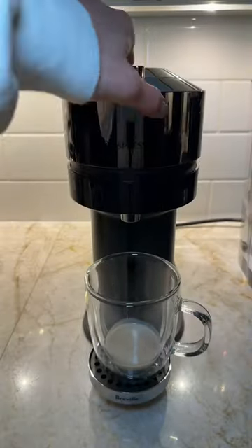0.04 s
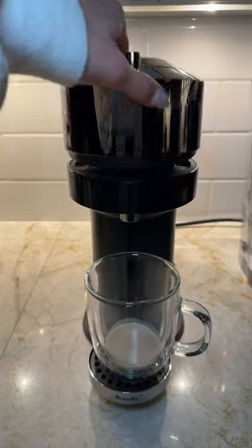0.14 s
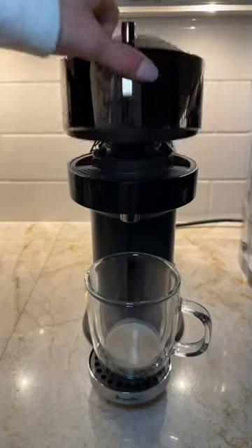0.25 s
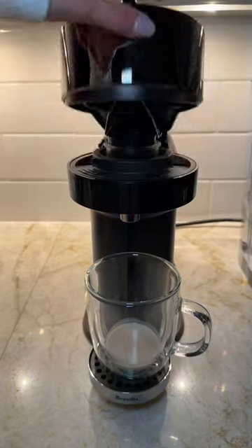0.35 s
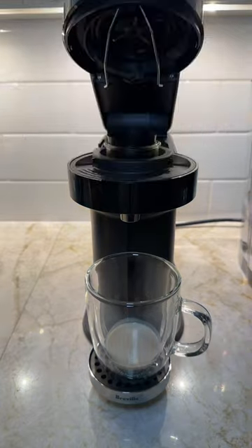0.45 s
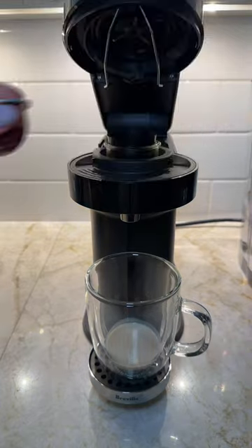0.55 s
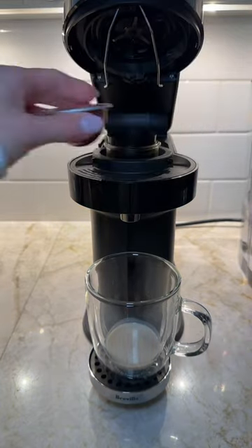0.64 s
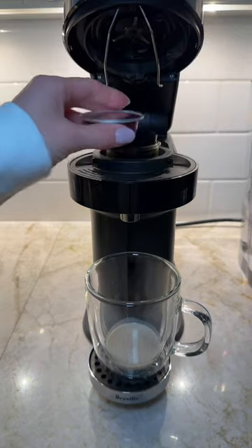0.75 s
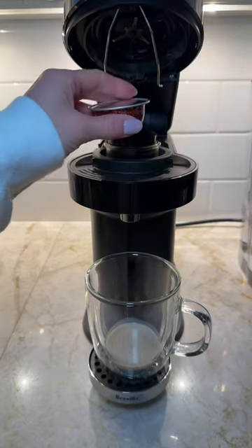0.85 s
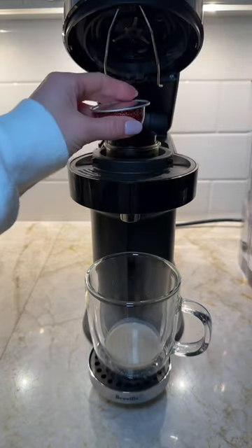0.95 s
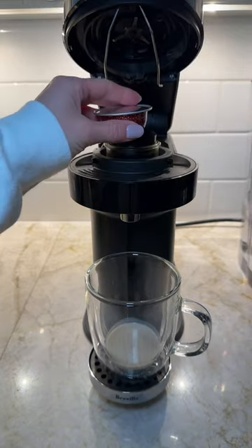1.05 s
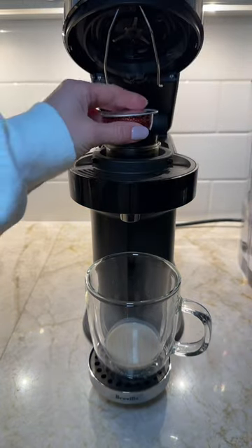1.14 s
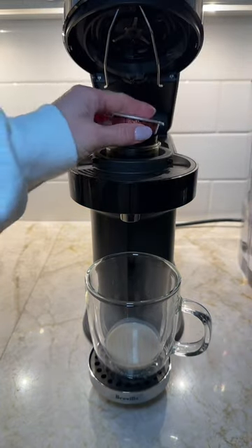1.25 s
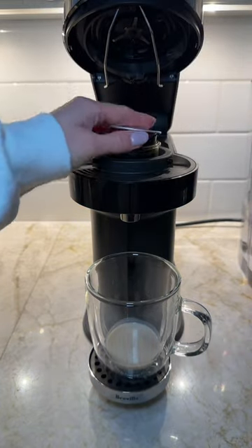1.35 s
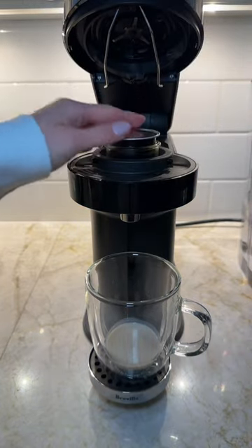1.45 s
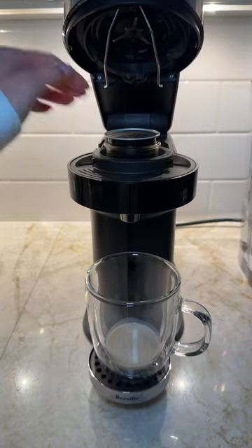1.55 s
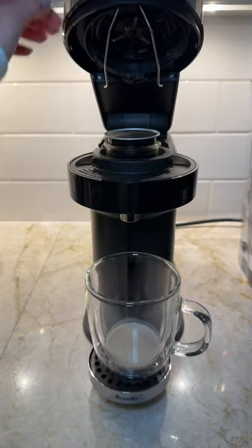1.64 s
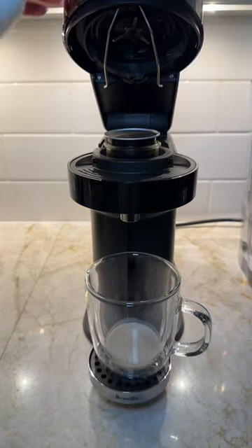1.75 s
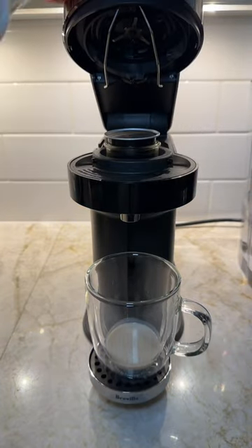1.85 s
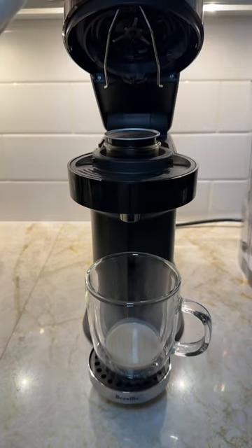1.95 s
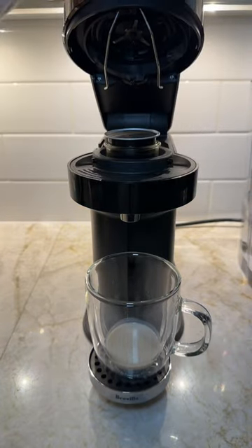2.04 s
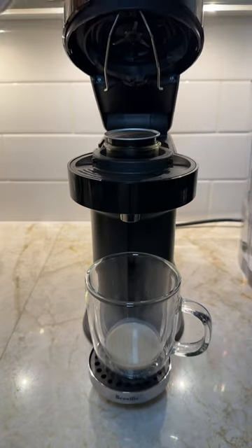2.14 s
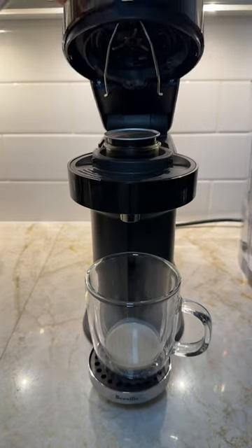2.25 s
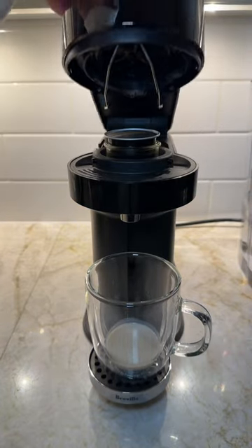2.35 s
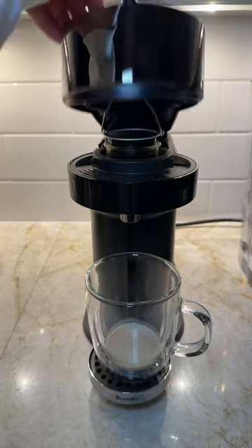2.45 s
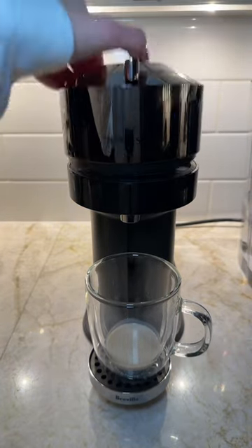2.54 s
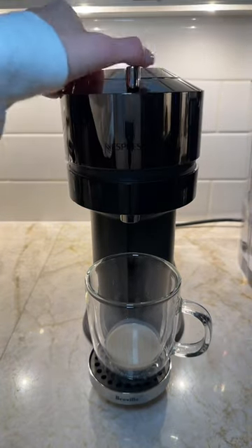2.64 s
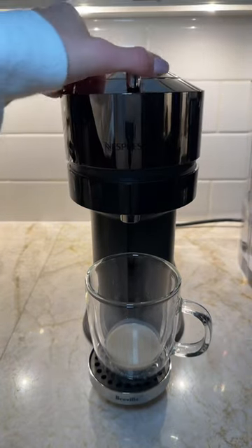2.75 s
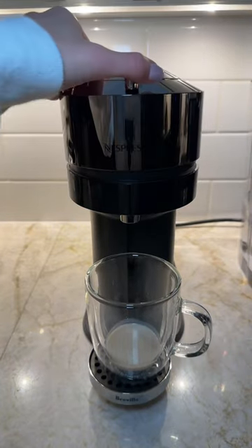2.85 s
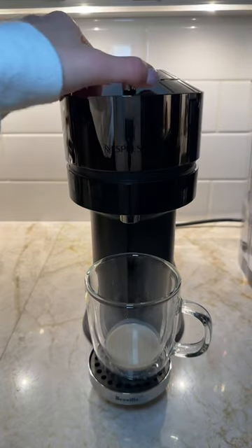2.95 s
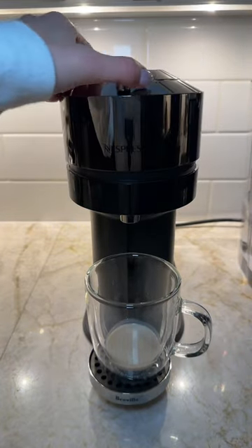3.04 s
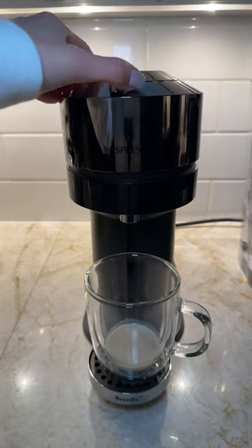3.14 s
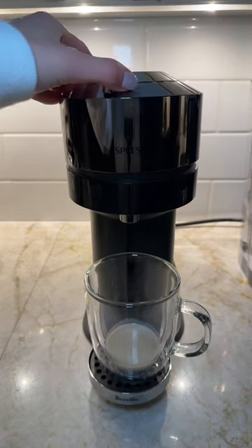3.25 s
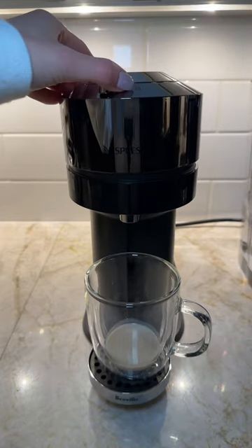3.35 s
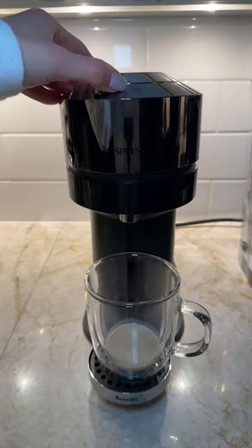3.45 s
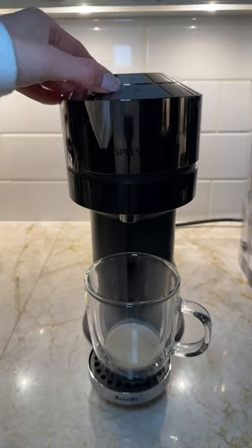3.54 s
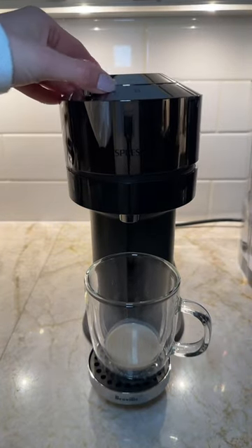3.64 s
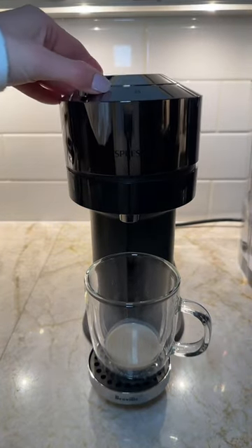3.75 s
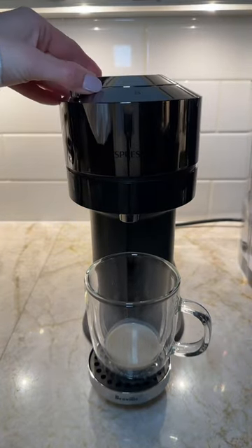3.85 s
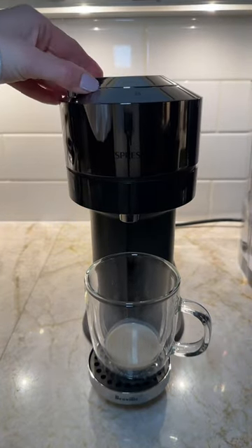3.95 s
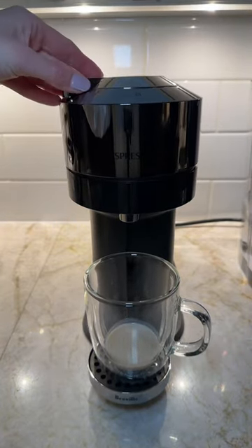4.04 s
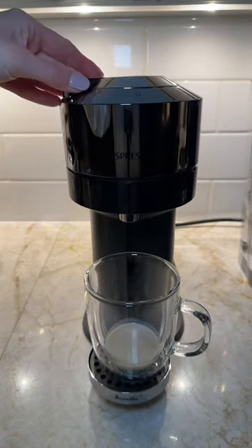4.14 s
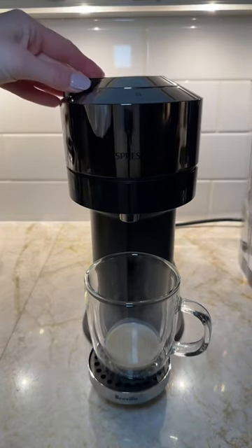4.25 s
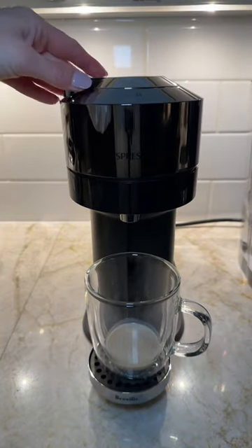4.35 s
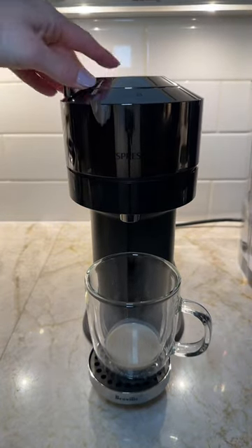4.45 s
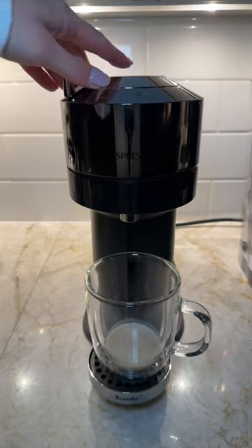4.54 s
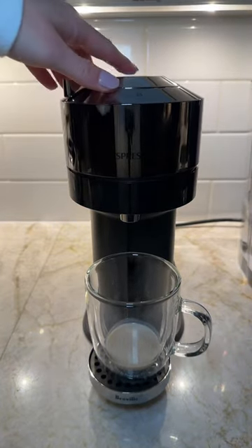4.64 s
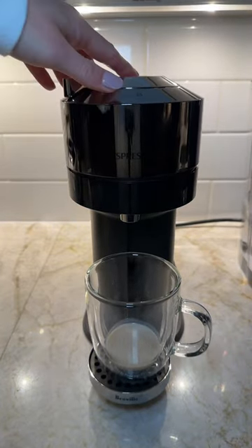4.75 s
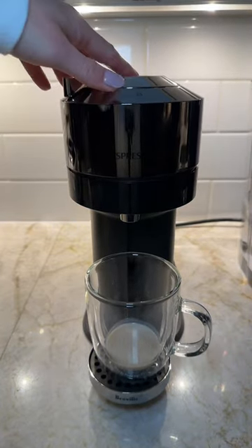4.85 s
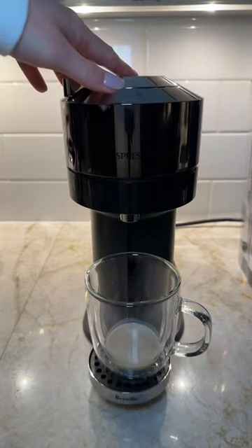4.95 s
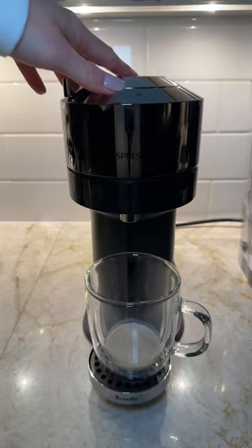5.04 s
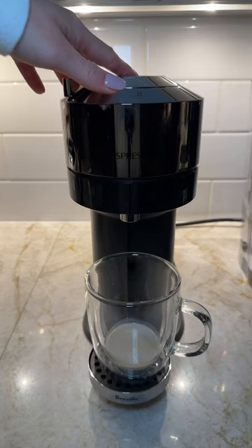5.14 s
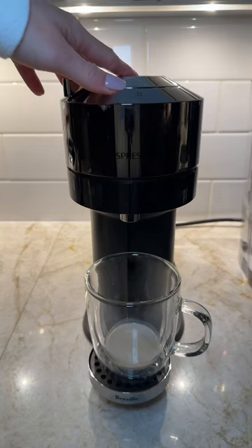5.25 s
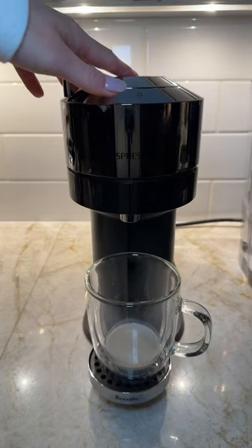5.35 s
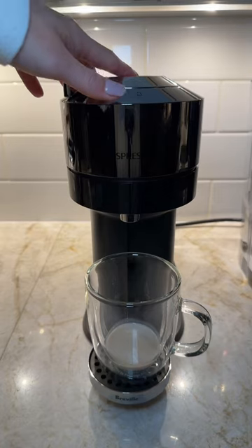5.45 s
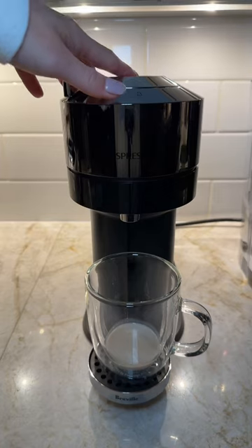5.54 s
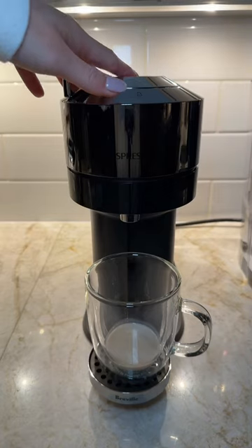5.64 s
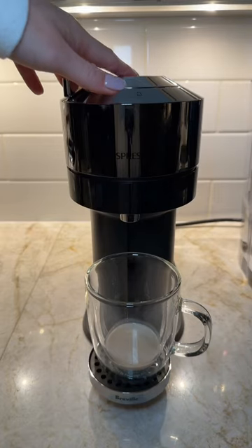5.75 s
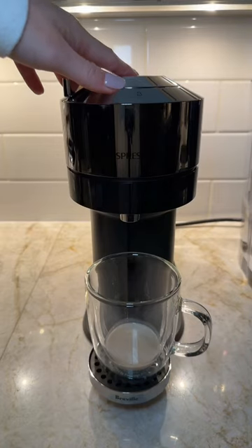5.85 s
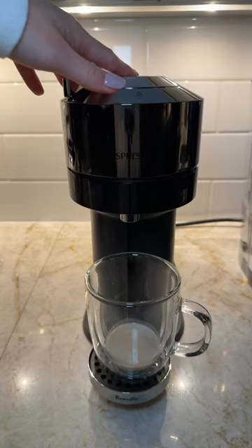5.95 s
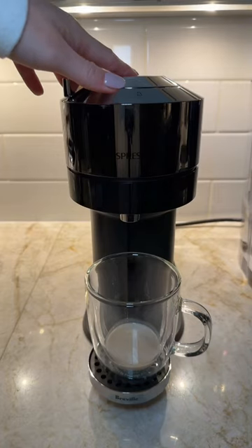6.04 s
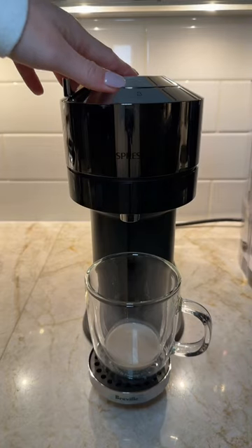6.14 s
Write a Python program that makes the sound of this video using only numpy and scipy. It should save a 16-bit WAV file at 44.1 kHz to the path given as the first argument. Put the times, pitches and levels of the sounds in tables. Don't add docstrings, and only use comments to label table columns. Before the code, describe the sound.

Close microphone in a hard, tiled kitchen with short bright reverberation and faint room air. From 0 s a plastic head unlatches with a dull knock, rattles and swings, striking its stop with a loud sharp clack at 0.43 s. Total silence from 0.55 to 0.74 s, then a low refrigerator hum near 115 Hz swells in and gradually settles. At 1.07 s a light capsule drops with a crisp ringing tick, bouncing at 1.13; soft rubbing and hollow clicks seat it at 1.5-1.75, small ticks and a low footstep thump around 2.1. At 2.76-2.86 the head slams in a dense, hard burst, its panels shivering away. Quiet lever scraping and knocks begin at 3.4, a bright click at 3.96, then a heavy clunk at 4.32. Mostly hum follows until faint button clicks at 5.67-5.84, when a grainy geared motor starts and quickly rises in loudness and pitch to the end.

```python
import sys
import numpy as np
from scipy import signal
from scipy.io import wavfile
from scipy.ndimage import uniform_filter1d

SR = 44100
rng = np.random.default_rng(int(sys.argv[2]) if len(sys.argv) > 2 else 0)


def elevation(decibels):
    levels = np.asarray(decibels, float)
    return 10 ** (levels / 20)


def dump(signal):
    limited = np.clip(np.atleast_2d(signal).T, -1, 1)
    pcm = np.round(limited * 32767).astype(np.int16)
    wavfile.write(sys.argv[1], SR, pcm)


N = 273420
TIME = np.arange(N) / SR

# (start [s], end [s])
GAP_S = (.551, 0.7395)


def rms_one(x):
    return x / np.sqrt(np.mean(x ** 2) + 1e-20)


def top_one(x):
    return x / np.sqrt(uniform_filter1d(x ** 2, size=88).max() + 1e-20)


def evened(x, size):
    return x / np.sqrt(uniform_filter1d(x ** 2, size=size) + 1e-12)


def at_hz(points, hz):
    points = np.array(points)
    return np.interp(np.log(hz), np.log(points[:, 0]), points[:, 1])


def band(x, low_hz, high_hz):
    sos = signal.butter(2, [low_hz, min(high_hz, 20000)], "band", fs=SR, output="sos")
    return signal.sosfilt(sos, x + 1e-18)


def resonance(x, hz, width_hz):
    r = np.exp(-np.pi * max(width_hz, 1) / SR)
    poles = [1, -2 * r * np.cos(2 * np.pi * hz / SR), r * r]
    return signal.lfilter(np.array([1, 0, -1]) * (1 - r * r) / 2, poles, x + 1e-18)


def body(x, peaks, widen):
    out = 0
    for k, (hz, width, db) in enumerate(peaks):
        out = out + (-1) ** k * elevation(db) * resonance(x, hz, min(widen * width, 700))
    return out


def drift(rate):
    r = np.exp(-80 * np.pi * rate / SR)
    slow = signal.lfilter([1], [1, -2 * r, r * r], rng.standard_normal(N // 40 + 2002))[2000:]
    return np.interp(np.arange(N) / 40, np.arange(len(slow)), rms_one(slow))


def grains(per_s, uneven_db):
    sizes = elevation(uneven_db * np.minimum(rng.exponential(1, N), 4)) * rng.choice([-1, 1], N)
    return sizes * (rng.random(N) < per_s / SR)


def swells(rows):
    out = np.zeros(N)
    for s, db, rise, fall in rows:
        last = min(s + 3 * fall, GAP_S[0] if s < GAP_S[0] else N / SR)
        at = np.arange(max(int((s - 3 * rise) * SR), 0), int(last * SR))
        t = at / SR - s
        out[at] += elevation(db - 20 * np.where(t < 0, -t / max(rise, .002), t / max(fall, .002)))
    return out


# (frequency [Hz], level [dB])
AIR_SPECTRUM = [(24, -39), (40, -17.5), (118, -2), (168, -12), (233, -6), (288, -10), (461, -13),
                (583, -23.5), (671, -18), (1460, -32), (1640, -30), (1800, -30.5), (8300, -37),
                (11000, -44.5), (14300, -77), (22000, -120)]
# (time [s], level [dB])
AIR_SWELL = [
    (0.75, 2),
    (6.2, -1.5),
]
AIR_DB, HISS_DB = -69, -90


def air():
    out, white = 0, rng.standard_normal((2, N))
    edges = 30 * 2 ** np.arange(0, 9.1, .5)
    for k, (low, high) in enumerate(zip(edges, edges[1:])):
        level_db = at_hz(AIR_SPECTRUM, np.sqrt(low * high)) + 0.5 * drift(9.2)
        out = out + elevation(level_db) * band(white[k % 2], low, high)
    hiss = elevation(HISS_DB) * rms_one(band(band(white[0], 12000, 14300), 11000, 14600))
    s, swell_db = np.transpose(AIR_SWELL)
    return out / np.std(band(out, 43, 11000)) * elevation(AIR_DB + np.interp(TIME, s, swell_db)) + hiss


# (multiple [1], level [dB])
OVERTONES = [(1, 0), (2, -11.5), (3, -24.5), (4, -22.5), (6, -26)]
# (frequency [Hz], width [Hz], level [dB])
UNSTEADY_TONES = [(1676, 33, -86.5), (234, 25, -70), (345, 16, -74.5)]
# (time of the top [s], level [dB], rise [s], fall [s])
RUMBLE = [
    (.05, -65.5, .5, 1.16),
    (.85, -68, 0.76, 0.34),
    (1.38, -67.5, 0.54, 0.26),
    (2.4, -68, 0.13, 0.57),
    (2.82, -56.5, 0.11, 0.17),
    (3.5, -63, 0.66, 2.),
    (4.36, -67.5, 0.36, 0.34),
    (4.65, -72, 0.17, 1.04),
]
RUMBLE_DB, RUMBLE_SAG_DB_PER_S = -74.5, 0.44
RUNNING_HZ, RUN_UP_HZ, RUN_UP_S = 114.5, 15, 0.5
HUM_DB, HUM_BEFORE_DB = -65, -80
STRAIN_DB, STRAIN_RISE_S, STRAIN_FALL_S = 11, 0.16, 1


def refrigerator():
    since = np.maximum(TIME - GAP_S[1], 0)
    hz = RUNNING_HZ - RUN_UP_HZ * np.exp(-since / RUN_UP_S) * (since > 0)
    strain_db = STRAIN_DB * (1 - np.exp(-since / STRAIN_RISE_S)) * np.exp(-since / STRAIN_FALL_S)
    level_db = np.where(since > 0, HUM_DB + strain_db, HUM_BEFORE_DB)
    phase = 2 * np.pi * np.cumsum(hz + 0.42 * drift(1.7)) / SR
    hum = sum(elevation(db + 1.5 * drift(25)) * np.sin(k * phase + k * k) for k, db in OVERTONES)
    hum = hum * np.sqrt(2) * elevation(level_db)
    rumble = evened(band(resonance(rng.standard_normal(N), 57, 3.5), 45, 77), size=9000)
    rumble = rumble * (swells(RUMBLE) + elevation(RUMBLE_DB - RUMBLE_SAG_DB_PER_S * TIME))
    tones = 0
    for f, width, db in UNSTEADY_TONES:
        tones = tones + elevation(db) * rms_one(resonance(rng.standard_normal(N), f, width))
    return hum + rumble + tones


# (frequency [Hz], t60 [s])
KITCHEN_T60 = [(150, 0.17), (700, 0.65), (2000, 0.58), (3500, 0.48), (5000, 0.42), (9000, 0.3),
               (15000, 0.08)]
SHIFTING = 2.5


def kitchen(x):
    t = np.arange(SR) / SR
    edges = 100 * 2 ** np.arange(0, 7.6, .5)
    white = rng.standard_normal((2, 2, SR))
    tails = 0
    for k, (low, high) in enumerate(zip(edges, edges[1:])):
        t60 = at_hz(KITCHEN_T60, np.sqrt(low * high))
        tails = tails + band(white[k % 2], low, high) * elevation(-60 * t / t60)
    tails = tails * np.minimum(t / 0.0064, 1)
    tails = tails / np.sqrt(np.sum(tails[0] ** 2))
    before = np.arange(N) < GAP_S[0] * SR
    wet = 0
    for part in (before, ~before):
        wet = wet + signal.fftconvolve((x * part)[None], tails, axes=1)[:, :N]
    turn = SHIFTING * drift(12)
    return np.cos(turn) * wet[0] + np.sin(turn) * wet[1]


# (time of the top [s], level [dB], rise [s], fall [s])
BUMPS = [
    (.048, -46.5, 0.061, 0.05),
    (.12, -53, 0.038, .08),
    (.172, -53, 0.044, 0.049),
    (.25, -53, 0.045, 0.098),
    (.446, -54.5, 0.023, .17),
    (2.83, -48.5, 0.049, 0.14),
    (3.398, -63, 0.039, 0.09),
    (3.468, -54.5, 0.034, 0.073),
    (4.128, -56.5, 0.098, 0.046),
    (4.325, -47.5, 0.027, 0.08),
]
# (time of the top [s], level [dB], rise [s], fall [s])
FOOTSTEP = [
    (2.11, -52.5, 0.03, 0.099),
    (2.17, -53, 0.13, 0.076),
]
# (frequency [Hz], width [Hz], level [dB])
COUNTER = [(91, 20, -1.5), (132, 80, -5.5), (161.6, 69, -4), (258.6, 7.6, -2.5)]


def bumps():
    knocks = band(body(grains(400, 0.37), COUNTER, widen=0.85), 61, 320)
    return swells(BUMPS + FOOTSTEP) * evened(knocks, size=1500)


# (time of the top [s], level [dB], rise [s], fall [s], dullness: low up, high down [dB])
SLIDING = [
    (0.0, -55, .1, 0.5, 3.5),
    (1.63, -64.5, 0.084, 0.12, 2.5),
    (2.15, -81.5, 0.34, 0.47, -5.5),
    (3.39, -70, 0.052, .06, 5),
    (3.47, -65, 0.04, 0.17, 5.5),
    (4.34, -63, .01, 0.21, 2),
    (3.828, -67.5, 0.3, 0.3, -0.5),
    (4.098, -63, 0.15, 0.15, 3),
    (4.312, -61, 0.079, 0.0032, -4.5),
    (4.334, -56.5, 0.011, 0.11, 8),
]
# (time of the top [s], level [dB], rise [s], fall [s])
RATTLE = [
    (2.762, -42, 0.003, 0.093),
    (2.788, -45.5, .003, 0.14),
    (2.81, -38.5, .015, 0.055),
    (2.848, -46, 0.03, 0.014),
]
# (time of the top [s], level [dB], rise [s], fall [s])
CLATTER = [
    (.142, -52, 0.047, 0.029),
    (.165, -52, 0.011, 0.044),
    (.278, -53, 0.01, 0.099),
    (0.439, -47, 0.027, 0.18),
]
# (frequency [Hz], width [Hz], level [dB])
THUD = [(196, 32, -1.5), (362, 79.6, 4), (497, 28, 7.5), (726, 24, -3.5), (1100, 7.7, -17),
        (1170, 79, -9.5)]
SLIDE_HIGH_DB = -16.5


def sliding():
    slips = grains(5000, 1.0) * elevation(1.5 * drift(31))
    low = rms_one(body(slips, THUD, widen=4.0))
    middle = rms_one(band(slips, 900, 3700))
    high = rms_one(band(slips, 8100, 20000))
    loose = rms_one(band(slips, 2900, 8800)) + elevation(-6.0) * low + elevation(-11.5) * middle + elevation(-14.0) * high
    out = swells(RATTLE + CLATTER) * loose
    for s, db, rise, fall, dull_db in SLIDING:
        stroke = middle + elevation(dull_db) * low + elevation(SLIDE_HIGH_DB - 1.8 * dull_db) * high
        out = out + swells([(s, db, rise, fall)]) * stroke
    return out


# (time of the top [s], level [dB], rise [s], fall [s])
FOIL = [
    (1.636, -59, 0.069, 0.079),
]
# (time of the top [s], level [dB], rise [s], fall [s])
PINCH = [
    (.82, -77.5, .2, .45),
]
# (frequency [Hz], width [Hz], level [dB])
HOLDER = [(1122, 200, -3.5), (1720, 110, 1.5), (1814, 73, -1.5), (2900, 300, -8), (3900, 420, -7.5),
          (4480, 200, -10), (5975, 95, -12), (6140, 120, -25), (7540, 90, -8), (8330, 530, -7),
          (10300, 71, -1.5), (11000, 93, -18)]


def foil():
    brush = grains(3100, 1.1)
    lid = [(hz, min(width, 150), 0) for hz, width, db in HOLDER[6:]]
    stroke = rms_one(rms_one(body(brush, lid, widen=1.2)) + .5 * rms_one(band(brush, 3360, 20000)))
    pinch = rms_one(rms_one(band(brush, 8100, 9700)) + rms_one(band(brush, 7000, 15000)))
    return swells(FOIL) * stroke + swells(PINCH) * pinch


# (time [s], level [dB], t60 [s], middle mode [Hz], mode spacing [Hz], blur [0-1])
HOLLOWS = [(0.26, -57, 0.36, 1300, 45, 0.45), (1.131, -53.5, 0.47, 1100, 110, 0.7),
           (1.518, -60, 0.13, 1550, 52, 0.4), (1.664, -52.5, 0.22, 960, 64, 1),
           (1.739, -52.5, 0.47, 1090, 60, 0.5), (3.97, -61, 0.37, 2000, 70, 0.9),
           (3.0, -57.5, 0.48, 520, 39, 0.95), (1.752, -58, 0.17, 350, 20, 0.2),
           (1.61, -64, .2, 4000, 45, .6), (0.18, -45.5, 0.065, 650, 92, 0.6),
           (0.36, -46, 0.088, 720, 40, 0.4), (5.965, -58, .4, 571, 15, .3),
           (6.135, -62.5, .5, 970, 13, 0.5), (2.808, -47.5, 0.33, 99, 5.8, 0.06),
           (2.853, -41, 0.74, 710, 22, 0.4), (2.856, -44, .45, 740, 62, .9), (2.87, -50, .2, 520, 48, .8),
           (1.068, -52.5, .3, 1150, 90, .9), (4.322, -44.5, .07, 410, 30, 0.2),
           (.44, -40.5, 0.13, 360, 32, .3), (.03, -46.5, 0.11, 200, 36, 0.7),
           (4.318, -52, 0.53, 960, 73, 0.62), (4.323, -39, 0.099, 210, 15, 0.17),
           (4.316, -47, 0.044, 767, 19, 0.5), (4.322, -48, 0.083, 520, 18, 0.2),
           (4.32, -40.5, 0.084, 440, 30, 0), (5.812, -51.5, 0.25, 410, 30.6, 0.13)]


def hollows():
    out, t = np.zeros(N + SR), np.arange(SR // 2) / SR
    for s, db, t60, hz, spacing, blur in HOLLOWS:
        modes = 0
        for k, share in ((-1, 1), (0, .8), (1.7, .5)):
            modes = modes + share * np.sin(2 * np.pi * (hz + k * spacing) * t)
        noise = band(rng.standard_normal(SR), hz - 1.5 * spacing, hz + 2 * spacing)
        loose = evened(noise, size=900)[SR // 2:]
        envelope = elevation(db - 60 * t / t60) * np.minimum(t / 0.00078, 1)
        at = round(s * SR)
        out[at:at + SR // 2] += envelope * ((1 - blur) * modes + blur * loose)
    return out[:N] * elevation(1.2 * drift(30) + 2.0 * drift(120))


# (time of the top [s], level [dB], rise [s], fall [s])
SHIVER = [
    (2.812, -53.5, 0.0054, 0.26),
    (2.858, -47, 0.005, 0.31),
    (3.07, -56.5, .2, 0.23),
]
# (time of the top [s], level [dB], rise [s], fall [s])
SIZZLE = [
    (2.86, -62.5, .01, .2),
    (3.02, -71, .15, 0.096),
]
# (frequency [Hz], width [Hz], level [dB])
HEAD = [(1630, 890, -1.5), (2258, 460, 5), (2650, 1400, 4), (3110, 780, 0), (4160, 500, -14)]


def shiver():
    knocks = grains(6000, 1.5) * elevation(2.0 * drift(90))
    buzz = band(band(knocks, 5000, 8000), 4000, 8500)
    small = rms_one(band(knocks, 3400, 6200)) + elevation(-5.5) * rms_one(buzz)
    return swells(SHIVER) * rms_one(body(knocks, HEAD, widen=1.1)) + swells(SIZZLE) * small


RATTLE_GROWS = 0.0027
RING_FED = 1.5


def contacts(rows, t60, thud_stretch, ring_db, crack, attack_s, tick_top_hz, sheen_db, wide, thud_hz):
    out, t = np.zeros((3, N + 7000)), np.arange(7000) / SR
    for s, db, hz, thud_db, tick_db in rows:
        dies = np.clip(t60 * (1.5 + RATTLE_GROWS * (db + 40.5)), .004, .12)
        rattle = rng.standard_normal((3, 7000)) * np.minimum(t / max(attack_s, 1e-4), 1)
        rattle[:, 8] += crack * np.array([4, 4, 1.5])
        blow = rattle[0] * elevation(-60 * t / dies)
        ring = blow * elevation(-60 * t / (RING_FED * dies))
        ring = resonance(resonance(ring, hz, wide * hz), hz, wide * hz)
        middle = band(band(blow, 1100, 3700), 800, 15000)
        thud = body(rattle[1] * elevation(-60 * t / (thud_stretch * dies)), THUD, widen=5.5)
        thud = band(thud, thud_hz / 2, thud_hz * 2)
        tick = rattle[2] * elevation(-60 * t / (0.26 * dies))
        tick = band(tick, 4500, tick_top_hz) + elevation(sheen_db) * band(tick, 12300, 15300)
        at = round(s * SR)
        out[0, at:at + 7000] += elevation(db - 15.5) * top_one(middle) + elevation(tick_db - 6) * top_one(tick)
        out[1, at:at + 7000] += elevation(db + ring_db) * top_one(ring)
        out[2, at:at + 7000] += elevation(thud_db - 8.5) * top_one(thud)
    return out[:, :N]


# (time [s], middle peak level [dB], strongest ring [Hz], thud level [dB], tick level [dB])
OPENING = [(.0005, -47, 2500, -33.5, -60.5), (.0074, -39, 1930, -35.5, -72), (.0619, -34, 2940, -64, -52),
           (.0625, -40, 5900, -73, -52), (.066, -39.5, 2000, -60, -55.5), (.116, -55.5, 999, -40.5, -69.5),
           (.138, -30.5, 2800, -58, -46), (.1572, -27.5, 2940, -30.5, -41.5), (.1585, -30, 3900, -44, -48),
           (.2345, -36, 1310, -37.5, -64.5), (.2606, -28, 1376, -35.5, -43.5),
           (.2735, -31, 7100, -53, -42.5), (.2766, -32, 2290, -34.5, -54), (.2907, -28, 1320, -73, -44.5),
           (.292, -33.5, 6540, -59, -47.5), (.283, -35, 2500, -60, -50.5),
           (.3252, -31.5, 2000, -34.5, -49.5), (.4286, -17, 7900, -37.5, -44.5),
           (.4334, -17.5, 4280, -29.5, -23.5), (.437, -26.5, 2200, -41, -33.5),
           (.4404, -27.5, 3140, -28, -41), (.4728, -30, 2980, -33.5, -37.5), (.479, -28.5, 4600, -49, -37),
           (.5224, -36.5, 3870, -54, -43)]


def head_opens():
    return contacts(OPENING, t60=0.051, thud_stretch=1.6, ring_db=-15.5, crack=1.1, attack_s=0.0014,
                    tick_top_hz=10800, sheen_db=-1.0, wide=.2, thud_hz=280)


# (time [s], middle peak level [dB], strongest ring [Hz], thud level [dB], tick level [dB])
CAPSULE = [
    (1.0615, -42, 2900, -45.5, -54),
    (1.067, -31, 3610, -36, -25),
    (1.0675, -32.5, 6170, -60, -42),
    (1.068, -37, 2900, -63, -50),
    (1.1298, -38, 1720, -37.5, -42),
    (1.1303, -40, 4420, -62, -49),
    (1.1411, -44, 1100, -39.5, -48),
    (1.291, -57.5, 1720, -50.5, -71),
    (1.336, -68, 2900, -58, -80),
]


def capsule_drops():
    hits = contacts(CAPSULE, t60=0.025, thud_stretch=3.8, ring_db=-6.0, crack=1.0, attack_s=0.0011,
                    tick_top_hz=9800, sheen_db=-3.0, wide=0.19, thud_hz=280)
    ring = elevation(16.5) * body(hits[0] + hits[2], HOLDER, widen=0.43) * elevation(3.4 * drift(45))
    return hits, ring


# (time [s], middle peak level [dB], strongest ring [Hz], thud level [dB], tick level [dB])
SEATING = [(1.5175, -56, 1630, -62, -79), (1.5763, -47, 1160, -75, -54.5), (1.5924, -53, 3300, -62, -54),
           (1.6626, -36.5, 2720, -52, -52), (1.6632, -40, 1700, -54.5, -60), (1.7365, -36, 2720, -49, -74),
           (1.737, -37, 3420, -76, -68), (1.7375, -39, 1700, -72, -75), (1.9415, -47, 2620, -60.5, -60),
           (2.038, -60, 2900, -69.5, -75), (1.941, -39.5, 3460, -68.5, -37.5),
           (2.0371, -54.5, 3860, -72, -57), (2.2444, -66, 1689, -65.5, -79), (2.3201, -50, 2830, -61, -47),
           (2.4845, -62.5, 1623, -63, -86)]
# (frequency [Hz], width [Hz], level [dB])
SEAT = [(520, 110, -9), (1040, 160, 1), (1700, 37, -12.5), (2720, 120, -24), (4600, 74, -8)]


def capsule_seats():
    hits = contacts(SEATING, t60=0.032, thud_stretch=4.5, ring_db=-11.0, crack=0.97, attack_s=0.0001,
                    tick_top_hz=11000, sheen_db=0.5, wide=0.3, thud_hz=300)
    return hits, elevation(15.5) * body(hits[0] + hits[2], SEAT, widen=1.0)


# (time [s], middle peak level [dB], strongest ring [Hz], thud level [dB], tick level [dB])
CLOSING = [(2.758, -27.5, 4260, -42, -41), (2.7618, -24, 3302, -40, -40), (2.7622, -26, 4350, -30.5, -24.5),
           (2.7852, -15.5, 7803, -39, -31.5), (2.787, -23.5, 4600, -50, -40),
           (2.7985, -40, 3044, -29.5, -35.5), (2.8045, -19, 3123, -45.5, -28),
           (2.8062, -21, 3114, -42, -27.5), (2.8075, -17.5, 6155, -44, -28.5),
           (2.8095, -20.5, 6087, -43.5, -33), (2.812, -25, 3980, -46.5, -32.5),
           (2.818, -28.5, 3900, -49, -37.5), (2.848, -33.5, 4880, -42.5, -47.5),
           (2.8524, -16, 1700, -21, -42.5), (2.8528, -22.5, 4280, -39.5, -44),
           (2.8537, -21, 2594, -36, -48.5), (2.864, -45.5, 2733, -32.5, -54)]
RING_FULL_S, RING_BEFORE_DB = 2.69, -13


def head_slams():
    hits = contacts(CLOSING, t60=.025, thud_stretch=0.52, ring_db=-6.0, crack=1.9, attack_s=0.00013,
                    tick_top_hz=9050, sheen_db=-0.5, wide=0.15, thud_hz=600)
    drive = (hits[0] + hits[2]) * elevation(RING_BEFORE_DB * (TIME < RING_FULL_S))
    return hits, elevation(6.5) * body(drive, HEAD, widen=0.49)


# (time [s], middle peak level [dB], strongest ring [Hz],
# thud level [dB], tick level [dB])
LOCKING = [(2.675, -58, 1300, -60, -80), (2.704, -65, 4300, -69.5, -67.5), (3.3188, -69, 5800, -64, -64),
           (3.3702, -62, 1860, -47.5, -87), (3.3839, -51, 1450, -45, -84), (3.4316, -49, 1550, -34.5, -86),
           (3.4545, -41.5, 2250, -33, -64), (3.455, -46.5, 3900, -60, -62), (3.7706, -48.5, 1550, -45, -87),
           (3.817, -42, 2900, -45, -81), (3.926, -68, 5430, -62, -53), (3.957, -28.5, 1970, -53, -30.5),
           (4.0334, -52, 3800, -67, -76), (4.0854, -60, 2390, -50, -60), (4.1107, -45.5, 1700, -47, -62),
           (4.111, -51, 2970, -70, -70), (4.2747, -64, 2900, -40.5, -61)]
# (time [s], middle peak level [dB], strongest ring [Hz], thud level [dB], tick level [dB])
HOME = [
    (4.3155, -22.5, 1770, -22.5, -35),
    (4.319, -27, 2770, -24, -42),
    (4.3235, -32.5, 1340, -34, -63),
    (4.572, -57, 2900, -77, -82),
    (4.6087, -55.5, 2650, -73, -95),
]


def lever_locks():
    turning = contacts(LOCKING, t60=0.047, thud_stretch=2.1, ring_db=-8.5, crack=0.99, attack_s=0.00076,
                       tick_top_hz=7500, sheen_db=-10.0, wide=0.38, thud_hz=280)
    home = contacts(HOME, t60=0.035, thud_stretch=1.13, ring_db=-13.5, crack=1.5, attack_s=0.00075,
                    tick_top_hz=10300, sheen_db=6.0, wide=0.22, thud_hz=500)
    return turning + home


# (time [s], middle peak level [dB], strongest ring [Hz], thud level [dB], tick level [dB])
BUTTON = [(5.6665, -61.5, 1354, -52, -77), (5.667, -70, 2800, -70.5, -80), (5.7399, -64.5, 2100, -47, -85),
          (5.75, -62.5, 1400, -56, -83.5), (5.8032, -55, 2000, -62, -95), (5.804, -62, 3050, -70, -85),
          (5.8154, -60, 2410, -47, -79), (5.8284, -57, 1860, -72, -85), (5.8367, -62.5, 2400, -49, -86),
          (5.8441, -60.5, 1910, -66, -86), (6.094, -67, 1900, -70, -83)]


def button_clicks():
    return contacts(BUTTON, t60=0.083, thud_stretch=1.0, ring_db=1, crack=0.99, attack_s=0.0007,
                    tick_top_hz=8900, sheen_db=-8.0, wide=0.43, thud_hz=403)


# (frequency [Hz], width [Hz], level [dB])
GEARBOX = [(195, 86, -0.5), (355, 84, -0.5), (445, 48, 1.5), (568, 49, 0.5), (805, 110, -12), (963, 55, -3),
           (1164, 160, -8.5), (2000, 400, -17), (2800, 1600, -21)]
MOTOR_ON_S, MOTOR_DB, MOTOR_GAIN_DB_PER_S, JOLT_DB, JOLT_S = 5.81, -66, 24, 12, 0.045
BRIGHTENS_DB = 3
PULSES_PER_S, PULSES_GAIN = 48, 52
WHINE_HZ, WHINE_OCTAVES_PER_S = 367, 3.24
SURGES_PER_S, SURGE_DB, SURGE_PHASE_S = 11.5, -0.5, 12


def motor():
    on = np.maximum(TIME - MOTOR_ON_S, 0)
    running = on > 0
    surge_db = SURGE_DB * np.cos(2 * np.pi * SURGES_PER_S * (TIME - SURGE_PHASE_S))
    level_db = MOTOR_DB + MOTOR_GAIN_DB_PER_S * on + JOLT_DB * np.exp(-on / JOLT_S) + surge_db
    per_s = PULSES_PER_S + PULSES_GAIN * on
    whine_hz = WHINE_HZ * 2 ** (WHINE_OCTAVES_PER_S * on)
    turns = np.cumsum(per_s * elevation(1.3 * drift(30))) / SR
    pulses = np.diff(np.floor(turns), prepend=0) * elevation(2.5 * rng.standard_normal(N))
    drive = rms_one(pulses) + 7.5 * rng.standard_normal(N)
    sound = 0
    for hz, width, db in GEARBOX:
        passing_db = 9 * np.exp(-(np.log(whine_hz / hz) / .17) ** 2)
        brighter_db = BRIGHTENS_DB * np.log2(hz / 570) * (on - 0.7)
        mode = resonance(resonance(drive, hz, 0.89 * width), hz, 0.84 * width)
        sound = sound + elevation(db + passing_db + brighter_db + 1.9 * drift(15)) * mode
    friction = rms_one(band(drive, 450, 1680) * running)
    sound = band(rms_one(sound * running) + elevation(-3.0) * on / 0.47 * friction, 120, 4400)
    return sound / np.std(sound[-12000:]) * elevation(level_db) * running


def scene():
    opening = head_opens()
    capsule, holder_ring = capsule_drops()
    seating, seat_ring = capsule_seats()
    closing, head_ring = head_slams()
    locking = lever_locks()
    button = button_clicks()
    hollow = hollows()
    rubbing = sliding() + foil() + motor()

    dry = np.sum(opening + capsule + seating + closing + locking + button, axis=0)
    dry = dry + shiver() + 1.16 * holder_ring + 0.8 * seat_ring + 0.38 * head_ring + hollow + rubbing

    sent = elevation(-14) * opening + elevation(-11.5) * capsule + elevation(-10.5) * seating
    sent = sent + elevation(-9.0) * closing + elevation(-14.0) * locking + elevation(-8.0) * button
    sent = sent[0] + .15 * sent[1] + elevation(-4.5) * sent[2]
    sent = sent + elevation(-17.0) * hollow + elevation(-12.5) * holder_ring + elevation(-16.0) * seat_ring
    sent = sent + elevation(-9.5) * head_ring + elevation(-14.0) * rubbing
    return (dry + kitchen(sent) + bumps() + refrigerator() + air())[None]


def roll_off(x):
    return signal.sosfilt(signal.butter(12, 16490, fs=SR, output="sos"), x)


def record(dry):
    gate = np.clip((GAP_S[0] - TIME) / .001, 0, 1) + np.clip((TIME - GAP_S[1]) / .012, 0, 1)
    dry = dry - 0.29 * resonance(dry, 10960, 1700)
    rounded = .23 * np.tanh(dry * gate / .23)
    mix = signal.sosfilt(signal.cheby2(10, 50, 16700, fs=SR, output="sos"), rounded)
    return roll_off(mix)


dry = scene()
out = record(dry)
dump(out)
```